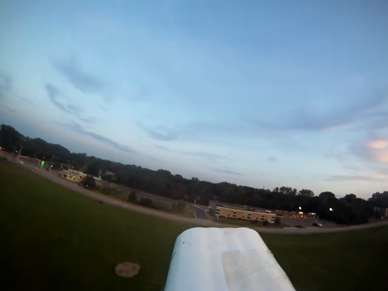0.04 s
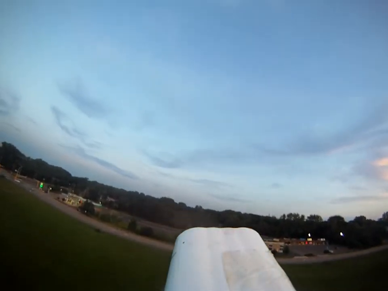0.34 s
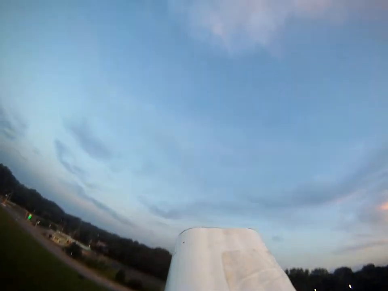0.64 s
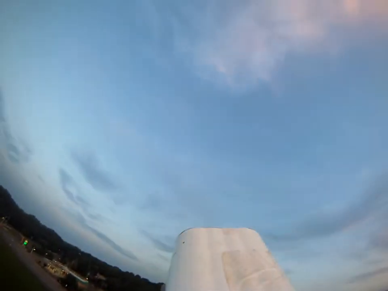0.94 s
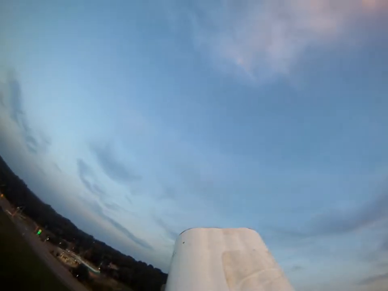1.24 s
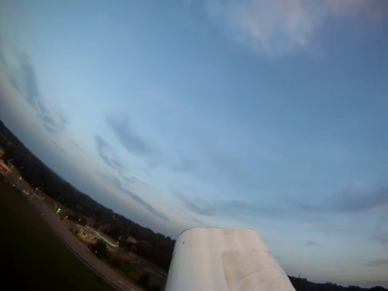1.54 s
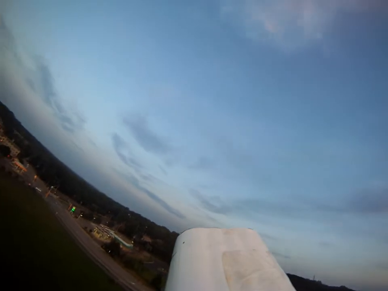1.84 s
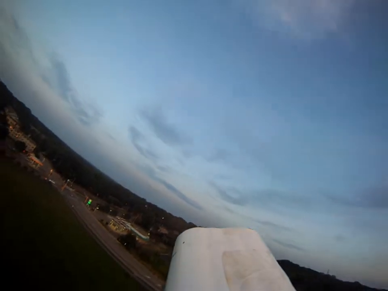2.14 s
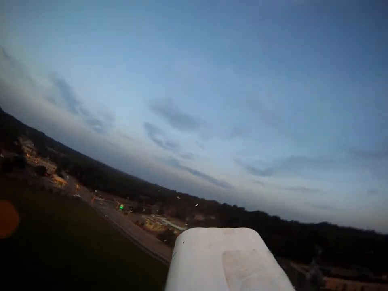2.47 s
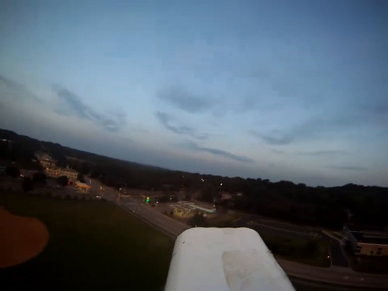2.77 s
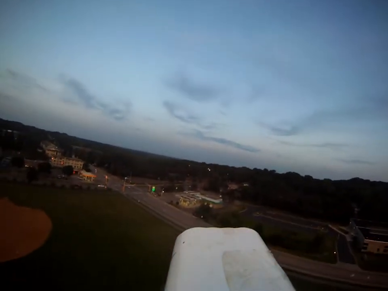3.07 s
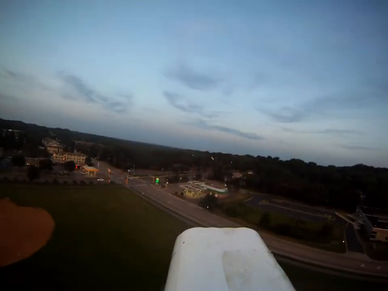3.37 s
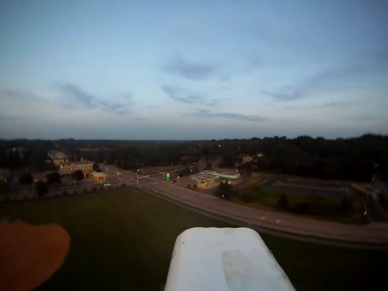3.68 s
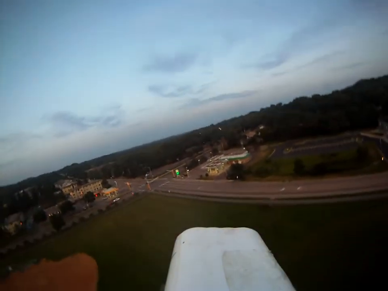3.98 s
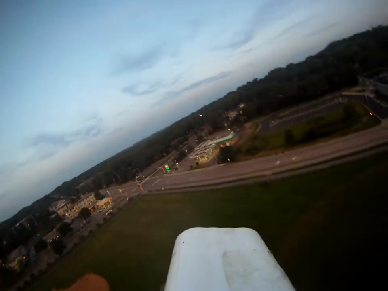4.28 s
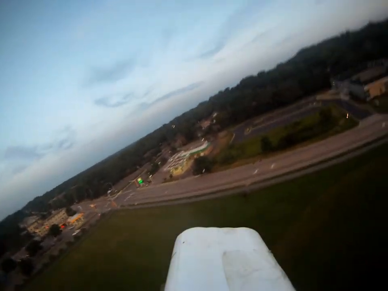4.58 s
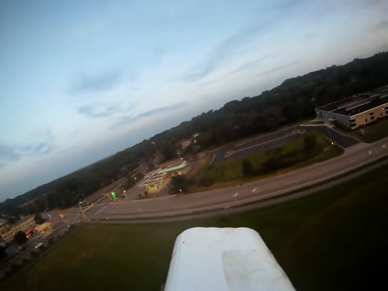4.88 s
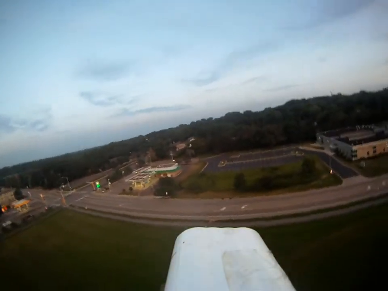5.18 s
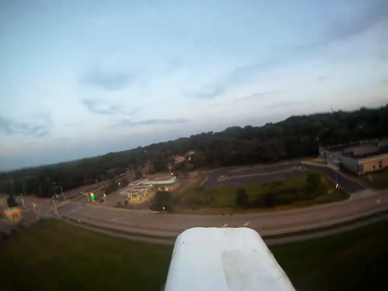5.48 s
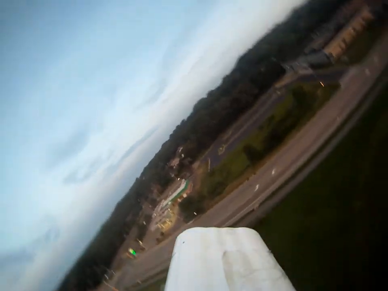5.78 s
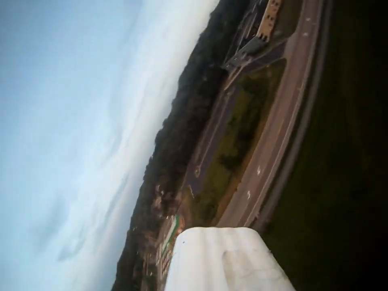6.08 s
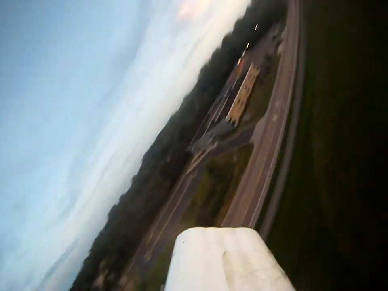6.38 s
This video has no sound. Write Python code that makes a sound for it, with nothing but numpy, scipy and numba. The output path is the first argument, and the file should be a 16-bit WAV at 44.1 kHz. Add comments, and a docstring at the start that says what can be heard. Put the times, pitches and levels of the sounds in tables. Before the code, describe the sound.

A small electric model airplane heard from on board: buzzing propeller, whining motor, rushing air, wind rumble and irregular sharp knocks.

```python
"""On the fuselage of an electric model airplane in flight, at the mic of a small strapped-on camera.
Close up, the shaft hums, the propeller buzzes through the airframe, and the brushless motor and its
speed controller whine; the throttle eases at 2 s, then creeps up. Prop wash rushes past, gusts rumble
on the mic, and something loose knocks now and then, ducking the camera's gain.
The camera's coarse sampling mirrors everything into the treble."""
import sys
import numpy as np
from scipy import signal
from scipy.fft import rfft, irfft
from scipy.io import wavfile
from numba import njit

SR = 44100
rng = np.random.default_rng(int(sys.argv[2]) if len(sys.argv) > 2 else 0)


def dump(signal):
    """Clip the signal to [-1, 1] and save it as 16-bit WAV at the path in sys.argv[1]."""
    limited = np.clip(np.atleast_2d(signal).T, -1, 1)
    pcm = np.round(limited * 32767).astype(np.int16)
    wavfile.write(sys.argv[1], SR, pcm)


N = 287532
TIME = np.arange(N) / SR
BINS_HZ = np.arange(N // 2 + 1) * SR / N

# shaft turns per second: t/s, f/Hz
SHAFT_SPEED = [(0.0, 112.8), (0.05, 112.3), (0.56, 112.0), (1.0, 110.0), (1.49, 109.0), (2.0, 108.7),
               (2.03, 108.6), (2.14, 104.9), (2.25, 100.5), (2.34, 98.7), (2.51, 97.6), (3.25, 97.8),
               (4.18, 98.8), (4.59, 100.3), (5.36, 102.7), (5.79, 102.5), (6.19, 103.9), (6.48, 103.8),
               (6.52, 104.2)]
# airframe resonances and one dead spot, felt by lines sliding through: f/Hz, width/Hz, lift/dB
AIRFRAME_MODES = [(106.9, 7.2, 4.3), (1122.5, 24, 6.5), (1422, 11, -9.5), (1601, 31, 3), (2105, 117, 9),
                  (3740, 25, 1), (4116, 33, 5), (4583, 116, 6.5)]
# blade tone, which drops away for most of a second and comes back: t/s, level/dB
BLADE_LEVEL = [(0, -32), (1.5, -30), (2.5, -28), (3.1, -30.5), (4.5, -28), (4.8, -35), (5.45, -49),
               (5.58, -28), (6.52, -27)]
# third harmonic of the hum: t/s, level/dB
THIRD_HARMONIC = [(0, -36), (.9, -40.5), (1.47, -31), (1.9, -43.5), (2.5, -38), (3.8, -40.5), (4.3, -44.5),
                  (5.9, -45.5), (6.35, -40.5)]
# airframe buzz: shaft multiple, base level at cruise/dB, power of speed, share following the blade tone
BUZZ_LINES = [(5, -47, -7.5, 0.6), (9, -34.5, 4.5, 0.6), (10, -30, 1.5, 0.23), (11, -29, 2.5, 0.83),
              (12, -27, -5.5, 0.16), (13, -23.3, -0.5, 0), (14, -28, 3.5, 0), (15, -32.5, 1, 0),
              (16, -35.5, -3.5, 0.2), (17, -42, -14, 0.6), (18, -40.5, -8, .7), (20, -44.5, -21, 0.7),
              (28, -46, 13.5, 0.7), (36, -40, -8, .02)]
# brief swells of one buzz line: t/s, shaft multiple, lift/dB, half length/s
BUZZ_SWELLS = [(1.05, 11, 12.5, .07), (2.48, 12, 3.5, .17), (4.68, 11, 8.5, .07)]
# the controller's switching beats with the commutation: switching multiple, shaft multiple
SWITCHING_BEATS = [(1, 84), (2, 126), (1, 42)]
# resonance that brings out each beat: f/Hz, width/Hz, level at centre/dB, smear rate/Hz, smear/rad
BEAT_RESONANCES = [(1260, 120, -25, 14, .35), (2150, 260, -32, 50, .9), (3780, 240, -29, 55, .65)]
# prop wash spectrum as the fuselage passes it to the mic: f/Hz, relative level/dB
WASH_SPECTRUM = [(90, -7), (170, -9.5), (380, -21), (800, -8), (1020, -8), (1170, 1.5), (1450, -4.5),
                 (1830, -9), (2050, 3), (2400, -8), (2720, -10), (2900, -19), (3700, -13), (4700, -24),
                 (5400, -24)]
# gusts on the mic: t/s, level over the steady wind/dB, half length/s
MIC_GUSTS = [(.3, 5, .12), (.85, 13, 0.3), (5.56, 10, .17), (6.423, 18, 0.23)]
# knocks of a loose part: t/s, relative level/dB
LOOSE_KNOCKS = [(.0186, 4.5), (.3431, 2.5), (.3625, -1), (.5411, 2.5), (.8391, 2.5), (1.5379, .5),
                (1.5511, -2), (1.6172, 3.5), (1.6749, 3), (2.0299, 3.5), (2.16, 2.5), (2.3909, 1.5),
                (2.7029, -.5), (2.8969, -.5), (3.6999, -.5), (3.9809, 3), (4.7339, 2), (4.8009, 3),
                (5.2139, 1), (5.6109, 1.5), (5.7649, 2), (6.0309, 1.5), (6.3795, 3), (6.3839, 3)]


def undb(db):
    """Decibels to gain."""
    return 10 ** (np.asarray(db) / 20)


def curve(table):
    """A table of times and values, sample by sample."""
    return np.interp(TIME, *np.transpose(table))


def swell(at_s, db, half_s):
    """A smooth rise and fall in decibels."""
    return db * np.exp(-((TIME - at_s) / half_s) ** 2)


def resonance(centre_hz, width_hz, hz=BINS_HZ):
    """Gain of a resonance at each frequency, 1 at its centre."""
    return 1 / (1 + ((hz - centre_hz) / width_hz) ** 2)


def noise(spectrum):
    """Noise of rms 1 with the given spectral shape."""
    x = irfft(rfft(rng.standard_normal(N)) * spectrum, N)
    return x / x.std()


def wander(rate_hz):
    """Slow random drift of rms 1."""
    return noise(np.exp(-(BINS_HZ / rate_hz) ** 2))


def tone(cycles, waver_db=1.2, shake_rad=.14):
    """A line whose level wanders and whose phase shakes in the turbulent air."""
    level = np.sqrt(2) * undb(waver_db * wander(3.5))
    return level * np.sin(2 * np.pi * cycles + shake_rad * wander(25))


def throttle_db(speed, cruise_db, power, cruise_hz=103):
    """Level of a source whose amplitude follows a power of the shaft speed."""
    return cruise_db + power * 20 * np.log10(speed / cruise_hz)


def airframe_db(line_hz):
    """Lift or dip that the airframe gives a sliding line on its way to the mic."""
    return sum(db * resonance(hz, width_hz, line_hz) for hz, width_hz, db in AIRFRAME_MODES)


def propeller(speed, turns, usual_blade_db=-29, dispersion=.08):
    """Unbalance hums once a turn, the blades pass twice, and higher multiples shake the airframe."""
    blade_db, third_db = curve(BLADE_LEVEL), curve(THIRD_HARMONIC)
    hum_db = throttle_db(speed, cruise_db=-21, power=1.6) + airframe_db(speed)
    out = undb(hum_db) * tone(turns, waver_db=.6, shake_rad=.022)
    out += undb(blade_db) * tone(2 * turns, waver_db=-.9, shake_rad=.062)
    out += undb(third_db) * tone(3 * turns)
    out += undb(third_db - 4) * tone(4 * turns)
    for multiple, cruise_db, power, share in BUZZ_LINES:
        db = throttle_db(speed, cruise_db, power) + airframe_db(multiple * speed)
        db += share * (blade_db - usual_blade_db)
        db += sum(swell(s, lift, half_s) for s, line, lift, half_s in BUZZ_SWELLS if line == multiple)
        # bending waves travel faster when higher, which smears each turn's jolt into a short chirp
        out += undb(db) * tone(multiple * turns + dispersion * multiple ** 2)
    return out


def motor(speed, turns, bell_db=-27, bell_speed_hz=100.8, bell_width_hz=7.7):
    """Fourteen magnets and three phases whine: 21 torque ripples and 42 commutations a turn."""
    whine = 0
    for multiple, cruise_db, power in ((21, -26.5, 0), (42, -31, .98)):
        db = throttle_db(speed, cruise_db, power) + airframe_db(multiple * speed)
        whine += undb(db) * tone(multiple * turns, waver_db=.5, shake_rad=.07)
    # a noise band near 3.9 kHz, where the controller's switching beat meets a resonance, pulses once a turn and
    # is loudest near one shaft speed
    bell_level = undb(bell_db) * resonance(bell_speed_hz, bell_width_hz, speed)
    pulsing = 1 + .18 * np.cos(2 * np.pi * turns)
    return whine + bell_level * pulsing * noise(resonance(3900, 400) ** 2)


def controller(turns, switching_hz=8025):
    """Switching beats with commutation: thin, sliding whistles that swell as they cross a resonance."""
    out = 0
    for (order, multiple), (hz, width_hz, db, smear_hz, rad) in zip(SWITCHING_BEATS, BEAT_RESONANCES):
        phase = 2 * np.pi * (order * switching_hz * TIME - multiple * turns)
        whistle = np.sqrt(2) * np.sin(phase + rad * wander(smear_hz))
        passband = resonance(hz, width_hz) * (BINS_HZ > 800)
        out += undb(db) * irfft(rfft(whistle) * passband, N)
    return out


def prop_wash(speed, turns, low_cut_hz=85):
    """Air from the propeller rushes past the mic, pulsing with the shaft and the blades."""
    hz, db = np.transpose(WASH_SPECTRUM)
    colour = undb(np.interp(np.log(BINS_HZ + 1), np.log(hz), db))
    colour *= BINS_HZ ** 2 / (BINS_HZ ** 2 + low_cut_hz ** 2)
    pulsing = 1 + .12 * np.cos(2 * np.pi * turns) + .22 * np.cos(2 * np.pi * 2 * turns)
    wash_db = throttle_db(speed, cruise_db=-19.5, power=.9) + .5 * wander(32)
    return undb(wash_db) * pulsing * noise(colour)


def wind_on_mic(steady_db=-43):
    """Wind and gusts rumble and rustle right on the camera."""
    wind_db = steady_db + sum(swell(*gust) for gust in MIC_GUSTS)
    rumble = noise(resonance(32, 22))
    rustle = undb(-16) * noise(resonance(400, 200))
    return undb(wind_db + 1.6 * wander(6.5)) * (rumble + rustle)


def knocks(level_db=-.25, start_hz=1850, fall_hz_per_s=330000, rise_s=.00075, rattle_s=.0025):
    """Each knock reaches the mic through the fuselage as a chirp, highs first, and trails a rattle."""
    out, t = np.zeros(N), TIME[:1024]
    rattle = noise(resonance(1610, 900))
    chirp = np.sin(2 * np.pi * (start_hz - fall_hz_per_s * t / 2) * t)
    blow = (t / rise_s * np.exp(1 - t / rise_s)) ** 2 * chirp
    trail = undb(-15) * t / rattle_s * np.exp(1 - t / rattle_s)
    for s, db in LOOSE_KNOCKS:
        span = slice(int(s * SR), int(s * SR) + len(t))
        out[span] += undb(level_db + db) * (blow + trail * rattle[span])
    return out


@njit
def gain_control(x, ceiling, attack, release):
    """Any peak over the ceiling pulls the camera's gain down within milliseconds; it recovers slowly."""
    y, peak, gain = np.empty(len(x)), ceiling, 1.
    for i in range(len(x)):
        peak = max(abs(x[i]), peak * release, ceiling)
        gain += (ceiling / peak - gain) * attack
        y[i] = x[i] * gain
    return y


def scene():
    """The mic rides on the same airframe as the sources: no distance, echo or Doppler shift."""
    speed = curve(SHAFT_SPEED)
    turns = np.cumsum(speed) / SR
    drive = propeller(speed, turns) + motor(speed, turns) + controller(turns)
    return (drive + prop_wash(speed, turns) + wind_on_mic() + knocks())[None]


def record(dry, ceiling_db=-1.2, attack_s=.0015, recovery_db_per_s=31, hold_hz=12000, top_hz=15350):
    """The camera's mono mic feeds gain control, soft clipping and a coarse sample-and-hold."""
    release = float(undb(-recovery_db_per_s / SR))
    x = gain_control(dry[0], float(undb(ceiling_db)), 1 / (attack_s * SR), release)
    x = x / (1 + (x / .97) ** 10) ** .1  # soft clip
    x = irfft(rfft(x) / np.sqrt(1 + (BINS_HZ / 5560) ** 50), N)  # steep low-pass ahead of the hold
    # holding each sample adds mirror images around the hold rate, weighted by a sinc
    x = x * (1 + 2 * np.cos(2 * np.pi * hold_hz * TIME))
    x = irfft(rfft(x) * np.sinc(BINS_HZ / hold_hz), N)
    treble_cut = signal.ellip(14, .1, 90, top_hz, fs=SR, output="sos")
    return signal.sosfilt(treble_cut, x)[None]


dry = scene()
out = record(dry)
dump(out)
```